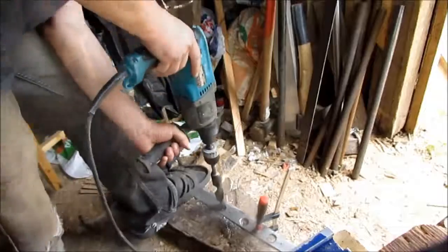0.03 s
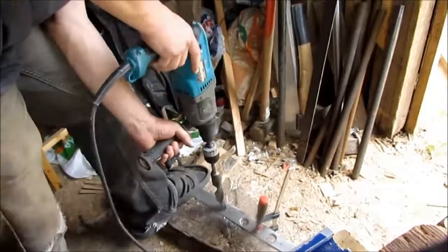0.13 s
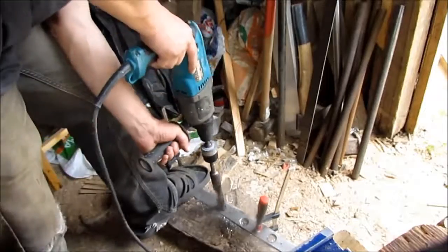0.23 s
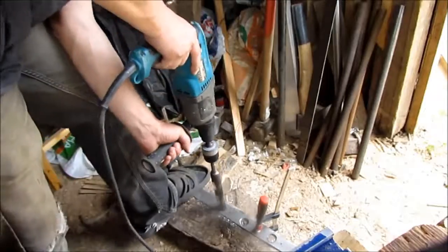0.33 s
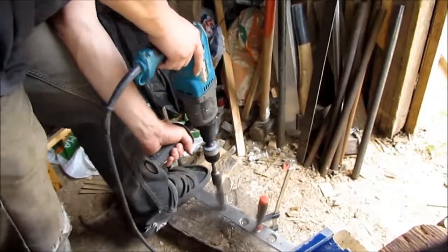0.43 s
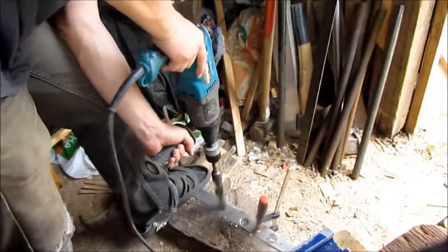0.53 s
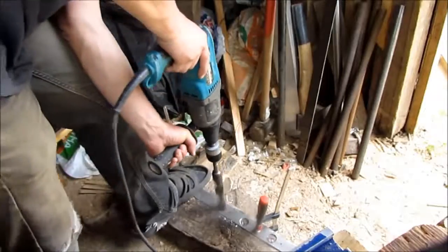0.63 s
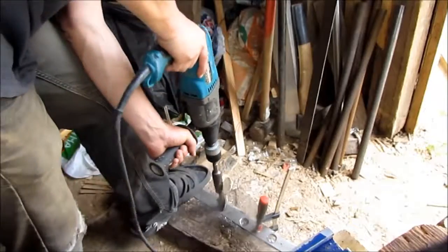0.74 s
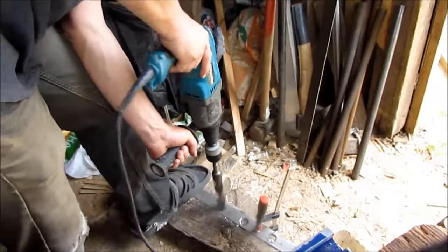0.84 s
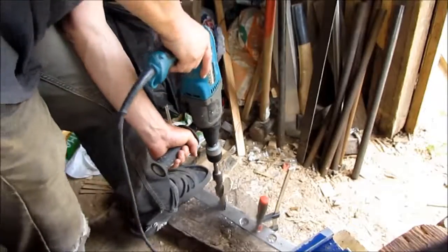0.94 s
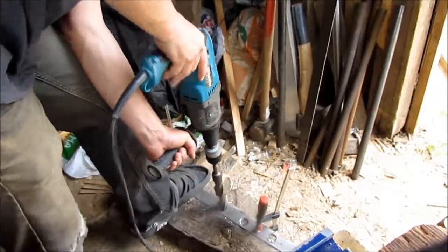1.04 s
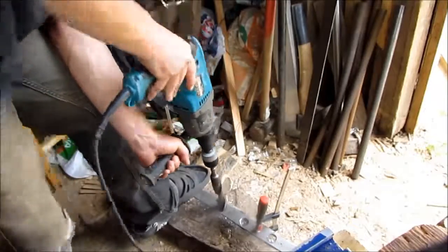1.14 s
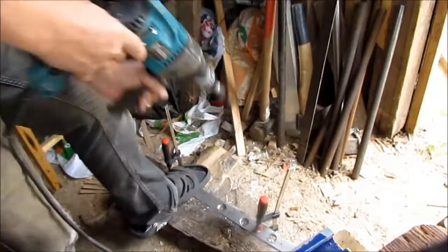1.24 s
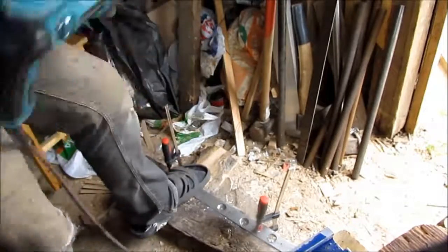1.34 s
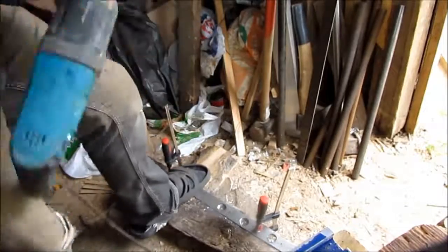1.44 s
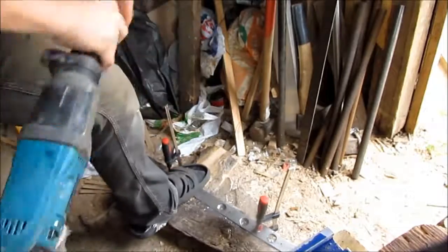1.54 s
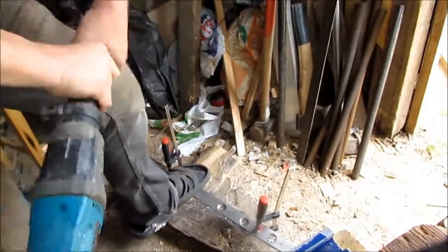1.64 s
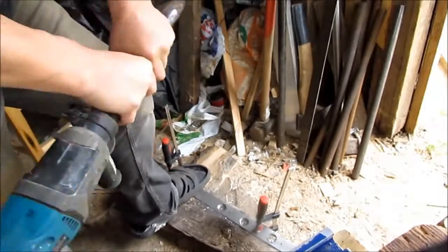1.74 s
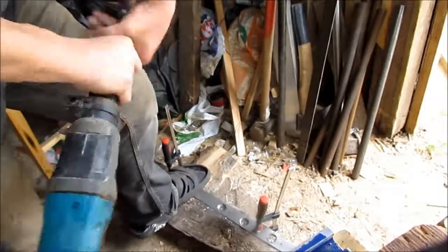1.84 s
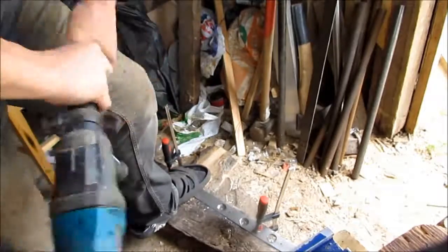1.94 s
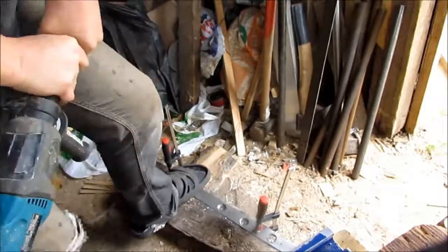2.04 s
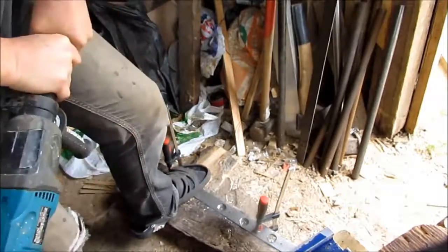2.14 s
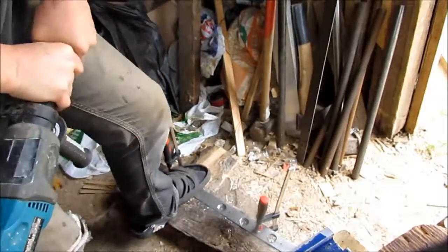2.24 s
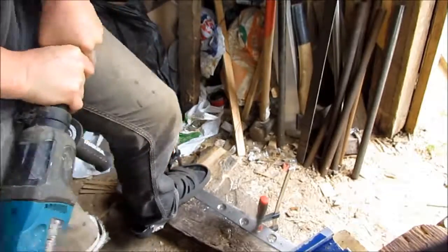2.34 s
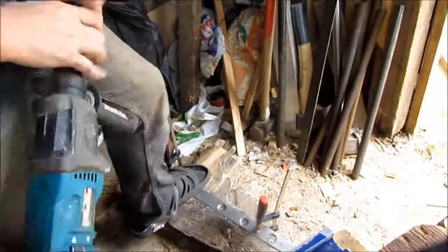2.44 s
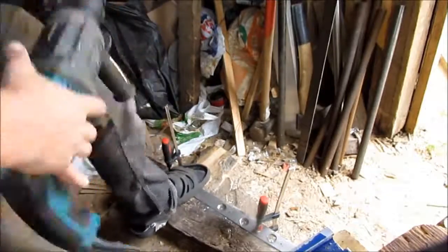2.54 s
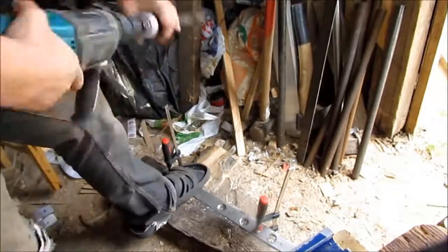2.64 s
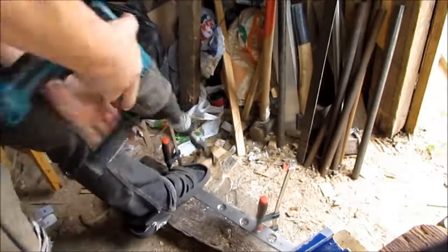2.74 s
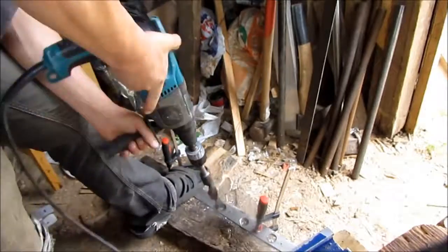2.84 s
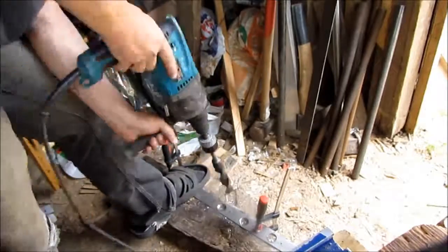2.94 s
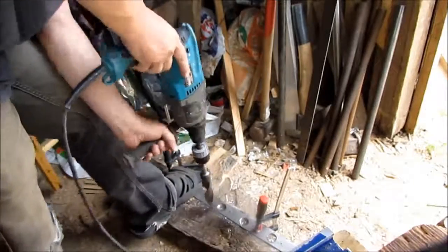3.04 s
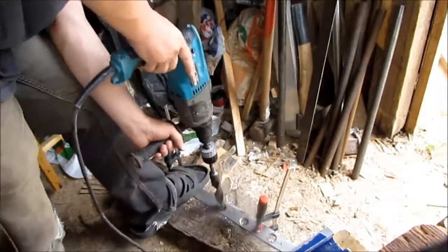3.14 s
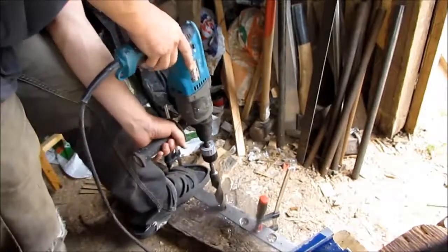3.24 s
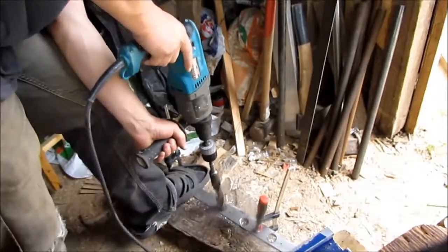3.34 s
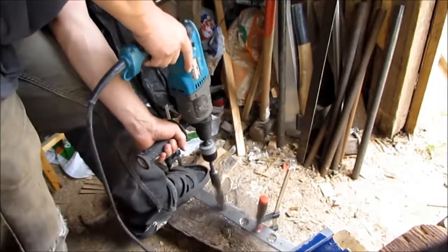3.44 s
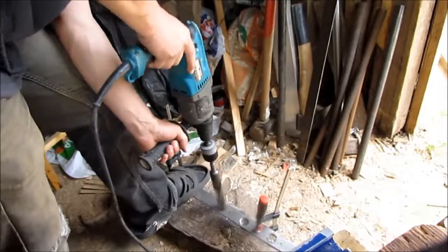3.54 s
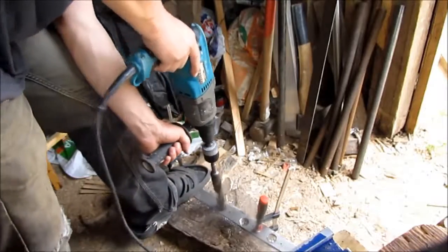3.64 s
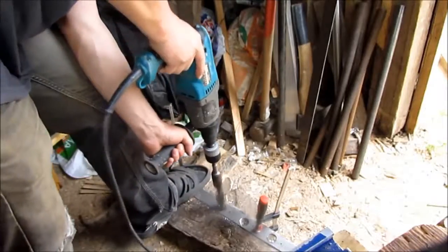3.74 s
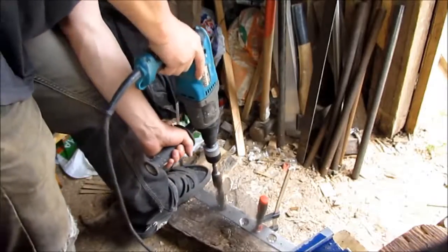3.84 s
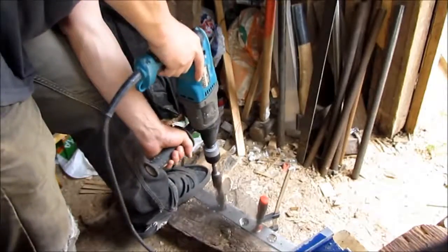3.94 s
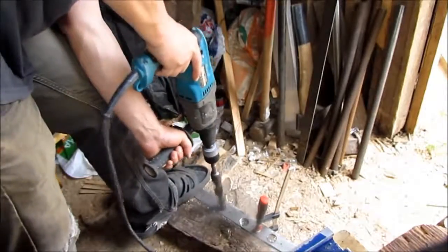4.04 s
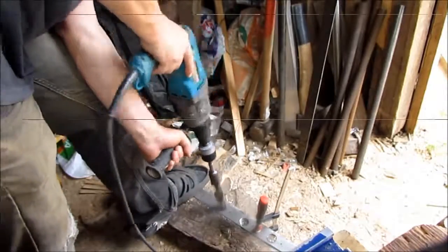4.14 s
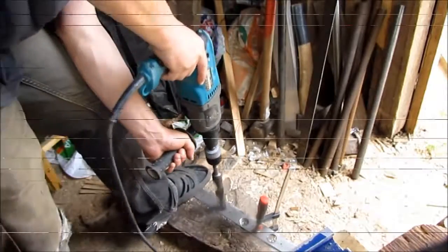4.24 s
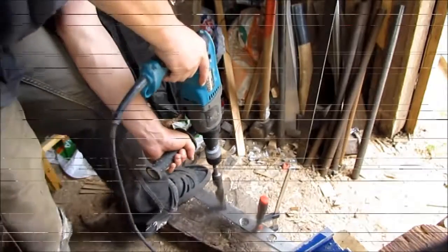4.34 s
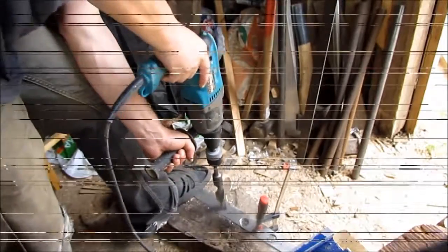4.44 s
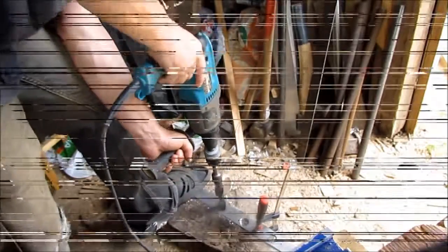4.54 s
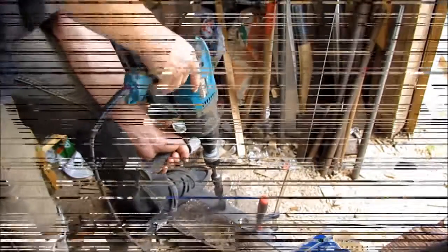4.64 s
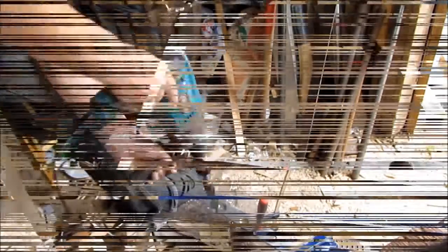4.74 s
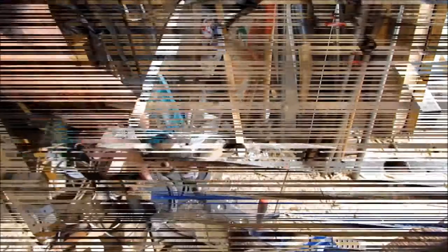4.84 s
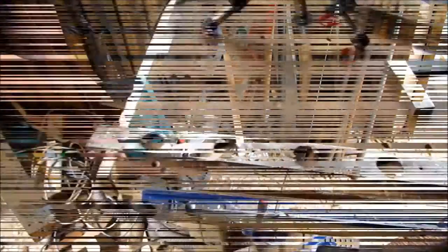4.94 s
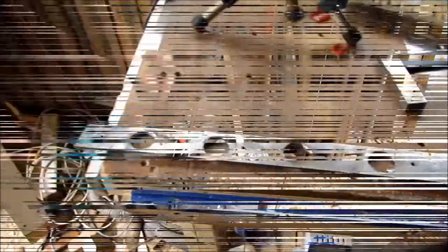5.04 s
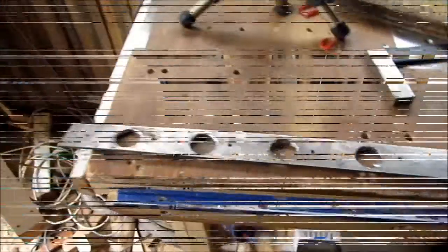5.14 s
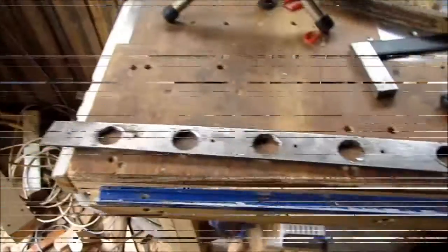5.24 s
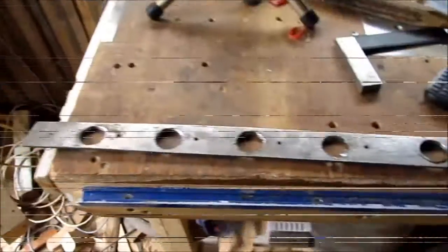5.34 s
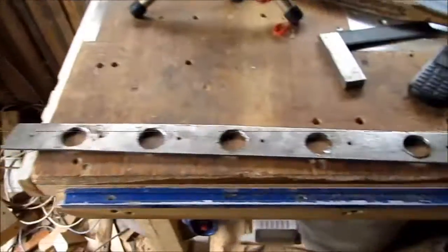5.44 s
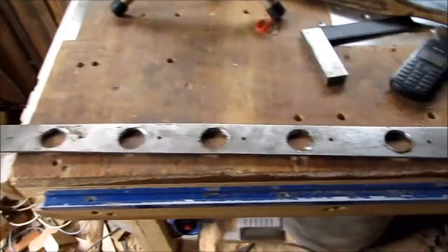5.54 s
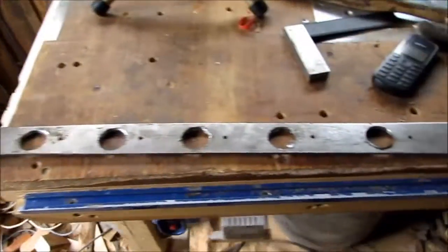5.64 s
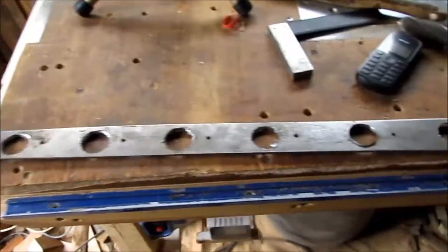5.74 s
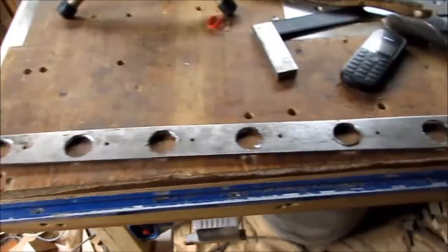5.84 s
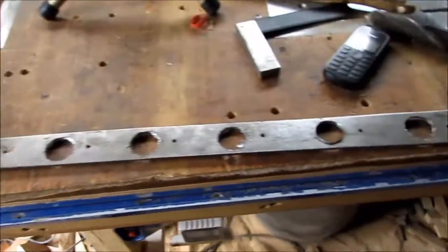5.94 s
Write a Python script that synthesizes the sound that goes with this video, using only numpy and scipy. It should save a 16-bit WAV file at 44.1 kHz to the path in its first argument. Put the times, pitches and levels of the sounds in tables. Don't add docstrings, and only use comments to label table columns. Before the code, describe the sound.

Stereo, close microphone, short dry room tail. A power tool hammers steel in two very loud, bright, buzzing bursts with short breaks of contact in the first. Each ends in falling gear whine and loose knocks. Between them come soft clothing movement, small clicks and little metal rings. At the end only a far-off engine drone with a low hum and slight rustle is left.

```python
import sys
import numpy as np
from scipy import signal
from scipy.io import wavfile
from scipy.ndimage import uniform_filter1d

SR = 44100
rng = np.random.default_rng(int(sys.argv[2]) if len(sys.argv) > 2 else 0)


def materialize(psi):
    bounded = np.clip(np.atleast_2d(psi).T, -1, 1)
    quanta = np.round(bounded * 32767).astype(np.int16)
    wavfile.write(sys.argv[1], SR, quanta)


def ratio(d):
    e = np.asarray(d, float) / 20
    return 10 ** e


N = 264889
BINS_HZ = abs(np.fft.fftfreq(4096, 1 / SR))
DISSOLVE_S = 4.2


def seconds():
    return np.arange(N) / SR


def evened(x):
    return x / np.sqrt(np.mean(x ** 2) + 1e-20)


def read(points, hz):
    f, value = np.transpose(points)
    return np.interp(np.log(hz + 1), np.log(f + 1), value)


def curves(rows):
    s, *columns = np.transpose(rows)
    t = seconds()
    inside = uniform_filter1d(1. * (t >= s[0]) * (t < s[-1]), size=150)
    return [np.interp(t, s, c) for c in columns] + [inside]


def causal(gain):
    taps = np.fft.ifft(np.exp(np.conj(signal.hilbert(np.log(gain))))).real
    size = len(taps)
    window = np.hanning(size + 1)[np.arange(size) - size // 2]
    return (taps * window)[:size // 2] / np.linalg.norm(taps)


def coloured(x, points):
    return signal.oaconvolve(x, causal(ratio(read(points, BINS_HZ))))[:len(x)]


def brightened(x, db):
    top = signal.sosfilt(signal.butter(2, 6000, "high", fs=SR, output="sos"), x)
    return x + (ratio(db) - 1) * top


def drift(per_s):
    slow = signal.butter(2, per_s, fs=SR, output="sos")
    return evened(signal.sosfilt(slow, rng.standard_normal(N)))


def add(mix, s, sound):
    part = mix[round(s * SR):][:len(sound)]
    part += sound[:len(part)]


def puff(length, noise, rise=0.0021, shape=1.21):
    t = np.arange(len(noise)) / SR
    fall = np.exp(-(t / np.clip(length, .0005, .05)) ** shape)
    return noise * (1 - np.exp(-t / rise)) * fall


def swell(s, db, rise, fall):
    u = seconds() - s
    return ratio(db) ** 2 * np.exp(-2 * np.where(u < 0, (u / rise) ** 2, u / fall))


# [trigger t/s, release t/s, coasting time/s]
PULLS = [
    (.217, 1.092, .235),
    (3.338, 4.58, .212),
]


def since_trigger():
    t = seconds()
    return np.min([np.where(t >= row[0], t - row[0], 9) for row in PULLS], axis=0)


DUCK_DB, DUCK_LAG_S, DUCK_S, RECOVER_DB_PER_S = 25, 0.051, 0.045, 27.5


def ducking():
    t, taken_db = seconds(), 0
    for on, off, coast in PULLS:
        onset = np.clip((t - on - DUCK_LAG_S) / DUCK_S, 0, 1)
        slowing_s = np.maximum(t - off - coast / 2, 0)
        taken_db = taken_db + onset * np.clip(DUCK_DB - RECOVER_DB_PER_S * slowing_s, 0, None)
    return taken_db


# [f/Hz, level/dB per Hz]
RUMBLE = [(12, -51), (20, -21), (114, -4), (217, 5.5), (477, -7.5), (528, -2.5), (584, -8.5), (759, -8.5),
          (1360, -17), (2500, -19.5), (3250, -36.5), (5500, -120)]
# [t/s, level/dB, rise/s, fall/s]
BUMPS = [(.05, -52, 0.076, .04), (.18, -49, 0.16, 0.046), (.8, -55, 0.036, .015), (.97, -64, 0.035, 0.046),
         (1.3, -74, 0.22, 0.69), (3.38, -71, 0.027, 0.046), (3.8, -68, 0.054, .05)]
# [f/Hz, level/dB per Hz]
RUSTLE = [(470, -36), (800, -0.5), (2150, 0), (2560, -2), (3350, 0.5), (3700, -1.5), (15100, -6.5),
          (15900, -12.5), (16500, -39)]
# [t/s, level/dB, rise/s, fall/s, treble share/dB]
SWELLS = [(.12, -49, 0.23, 0.12, 1), (1.6, -62.5, 0.063, 0.039, 9), (1.77, -59, 0.048, 0.035, 17.5),
          (1.845, -69, 0.011, .012, 20), (1.89, -58, 0.012, 0.13, 11.5), (2.055, -52.5, 0.082, 0.025, 8.5),
          (2.35, -54.5, 0.15, 0.16, 3), (2.46, -47.5, 0.019, 0.18, 2), (2.75, -53.5, 0.15, 0.22, 0),
          (2.9, -52.5, 0.062, 0.062, 8), (3.13, -58, 0.028, 0.017, 8), (4.8, -69, 0.039, .02, 5),
          (5.32, -54.5, 0.013, 0.06, 2), (5.45, -61.5, 0.25, 0.17, -4)]
RUMBLE_DB = -58
RUSTLE_DB, SECOND_RUSTLE_DB, RUSTLE_DUCK = -58, -67, 0.45


def shed():
    first, duck_db = seconds() < DISSOLVE_S, ducking()
    low = np.sqrt(first * ratio(RUMBLE_DB - duck_db) ** 2 + sum(swell(*row) for row in BUMPS))
    rumble = low * ratio(4.5 + 2.0 * drift(7.7)) * coloured(rng.standard_normal(N), RUMBLE)
    lumps = ratio(1.85 * drift(140) + 0.23 * drift(34))
    grains = coloured(evened(rng.standard_normal(N) * lumps), RUSTLE)
    rest = ratio(np.where(first, RUSTLE_DB - RUSTLE_DUCK * duck_db, SECOND_RUSTLE_DB)) ** 2
    swells = np.array([swell(*row[:4]) for row in SWELLS])
    power = rest + swells.sum(axis=0)
    treble_db = np.transpose(SWELLS)[4] @ swells / power
    return rumble + np.sqrt(power) * brightened(grains, treble_db)


# [f/Hz, width/Hz, level/dB]
BAR = [(782, 37, -35.5), (810, 42, -35), (1120, 23, -11), (1463, 35, -1), (1556, 140, -3), (1776, 54, -7.5),
       (2200, 30, -3.5), (2494, 283, -2), (2700, 105, -1), (2898, 210, -0.5), (3140, 144, -3.5),
       (3460, 460, -2), (4060, 186, -0.5), (4420, 89, -8), (5000, 310, -9.5), (5600, 190, -7.5),
       (6400, 81, -6.5), (7000, 760, -9.5), (7800, 330, -8.5), (8600, 120, -6), (10900, 780, -10.5),
       (12100, 140, -6.5)]
# [f/Hz, level/dB per Hz]
RATTLE = [(100, -69.5), (250, -48), (450, -50), (570, -30.5), (680, -16), (1300, -17), (2000, -12),
          (2500, -20), (4300, -8), (6000, -10), (10000, -11.5), (15500, -14), (17000, -81)]
LEAST_WIDTH_HZ = 80


def steel(force):
    modes = 0
    for hz, width, db in BAR:
        off_centre = 2 * (BINS_HZ - hz) / max(width, LEAST_WIDTH_HZ)
        modes = modes + (ratio(db) / (1 + off_centre ** 2)) ** 2
    modes = modes * np.clip(BINS_HZ / 300, 1e-3, 1) ** 8
    gain = np.sqrt(ratio(read(RATTLE, BINS_HZ)) ** 2 + modes)
    return signal.oaconvolve(force, causal(gain))[:len(force)]


# [t/s, peak level/dB, treble share/dB, bass share/dB, length/s]
KNOCKS = [(0.0282, -18, -10.5, 8, 0.0095), (0.046, -17.5, -8, 5, 0.0035), (0.075, -27.5, -9, -9, 0.0036),
          (0.098, -22, -21, 17, 0.0062), (0.12, -10.5, -7.5, 2, 0.0046), (0.15, -15, 0.5, 15, 0.0021),
          (0.193, -25.5, -7, -5, 0.0033), (0.775, -6.5, 3, -3, 0.0025), (0.826, -17, -1, -2, 0.005),
          (1.025, -9.5, 1, -10, 0.0034), (1.102, -11, 2, -7, 0.0029), (1.203, -32, -6, 6, 0.0054),
          (2.063, -26.5, 0, 6, 0.0018), (2.436, -24.5, -1.5, -12, 0.0062), (2.884, -28.5, 11, 7, 0.0048),
          (3.185, -9, -8, 3.5, 0.0025), (3.204, -16, -4, -4, 0.0023), (4.442, -11.5, -2.5, -2, 0.0062),
          (4.457, -22, -12, -6, 0.0037), (4.527, -17, 0.5, -15, 0.004), (4.542, -14, -1.5, -5.5, 0.0081),
          (4.5704, -13.5, -1.5, -2, 0.0041), (4.577, -17.5, -0.5, -4, 0.0079), (4.679, -26, 7, -7, 0.017),
          (4.741, -36, 4, 15, 0.0073)]


def knocks():
    out = np.zeros(N)
    noises = rng.choice([-1., 1.], (len(KNOCKS), 4000))
    for (s, db, treble_db, bass_db, length), noise in zip(KNOCKS, noises):
        tilt = [(1700, bass_db), (2400, 0.0015), (4500, 0.0041), (8000, treble_db)]
        add(out, s, ratio(db - 5.5) * coloured(steel(puff(1.5 * length, noise)), tilt))
    return out


# [t/s, peak level/dB, centre f/Hz, skirts level/dB]
SNAPS = [(2.1575, -36, 7040, -6), (2.193, -37, 6000, 1), (2.2195, -34, 9000, -4), (2.2945, -35, 7100, -2),
         (2.311, -42, 6500, 0), (2.3165, -37, 3500, -5), (2.333, -29, 6000, -2), (2.342, -33, 3300, -5),
         (2.350, -32, 10500, -5), (2.401, -30, 5500, -2), (2.452, -24, 8000, -14), (2.468, -29, 11500, -8),
         (.038, -19, 4000, -4), (.239, -5, 3300, -11), (2.6145, -19.5, 9800, -5), (2.8915, -20, 9500, -3),
         (2.905, -31, 2200, -10), (2.913, -33, 7000, -4), (3.3605, -8, 6900, -13), (3.35, -12, 2900, -8),
         (3.385, -7, 3000, -6), (3.396, -7, 3000, -9), (3.4205, -6, 3300, -7), (3.444, -8, 2900, -5),
         (3.486, -9, 7500, -5), (4.1016, -11, 3400, -5), (.45, -12, 4100, -7), (.597, -9, 4060, -7),
         (.262, -8.5, 3500, -4), (.744, -10, 4500, -2), (.76, -13, 8000, -3), (.885, -10, 7000, -2),
         (1.103, -17, 5600, -9), (2.081, -37, 5000, -3), (2.864, -34, 9500, -8), (2.985, -38, 4000, -3),
         (3.104, -38, 3000, -3), (3.116, -39, 9000, -4), (3.148, -38, 3000, -3), (2.625, -37, 2000, -3),
         (4.4605, -16, 2700, -4), (4.5815, -14, 3300, -4)]
# [t/s, peak level/dB, centre f/Hz, skirts level/dB]
TICKS = [(1.419, -36, 8700, -4), (1.4415, -34, 4200, 0), (1.452, -35.5, 6500, -6), (1.481, -36.5, 3420, 2),
         (1.512, -40, 3450, -9.5), (1.708, -36, 7930, -8), (1.7546, -32.5, 8150, -14),
         (1.837, -36.5, 11730, -8), (1.973, -37, 11100, -8), (2.034, -25, 6600, -13),
         (2.0605, -27.5, 7350, -5), (2.258, -34, 11200, -14), (2.354, -25.5, 9400, -1),
         (2.368, -25, 6800, -5), (2.391, -27, 6040, -7), (2.4278, -26, 4020, -10), (2.45, -24, 11200, -11),
         (2.614, -25, 9700, -10), (2.6903, -32, 5530, -1.5), (2.7162, -20, 8400, -11),
         (2.774, -27.5, 4100, -7), (2.886, -26, 9900, -5), (2.91, -32, 8660, -6), (5.035, -33, 4140, 0),
         (5.11, -32, 4400, 0), (5.317, -37.5, 3337, -4), (5.577, -36, 3500, 0)]


def ticks(table, length, rise, width=0.34):
    out = np.zeros(N)
    noises = rng.choice([-1., 1.], (len(table), 1500))
    for (s, db, hz, skirt_db), noise in zip(table, noises):
        below = [(hz / 40, skirt_db - 35), (hz / 12, skirt_db - 12.0), (hz * (1 - width / 2), skirt_db)]
        above = [(hz * (1 + width / 2), skirt_db), (22000, skirt_db - 10.5)]
        band = sorted(below + [(hz, 0)] + above)
        add(out, s, ratio(db - 6.0) * coloured(puff(length, noise, rise), band))
    return out


# [t/s, peak level/dB, start f/Hz, end f/Hz, length/s]
RINGS = [(0.043, -38, 258, 232, 0.023), (0.093, -37.5, 445, 458, 0.044), (0.153, -33, 2310, 1970, 0.009),
         (.782, -34, 5600, 5400, 0.048), (.782, -35, 10900, 11200, .024), (.803, -35, 11200, 10100, .026),
         (.99, -37, 6600, 6300, .04), (1.136, -41, 4060, 4060, 0.033), (1.325, -45.5, 3580, 3380, 0.028),
         (2.432, -49.5, 460, 452, 0.026), (2.435, -42.5, 900, 915, 0.017),
         (2.438, -44.5, 1220, 1184, 0.024), (2.439, -42, 11750, 11200, 0.054),
         (2.438, -46, 4100, 3980, 0.022), (2.454, -62, 4700, 4720, .12), (2.45, -53, 8550, 8500, .06),
         (2.436, -51, 2950, 2960, 0.054), (2.446, -60, 2940, 2960, 0.25), (3.188, -40, 753, 776, 0.033),
         (3.1853, -27, 4100, 4080, 0.01), (3.185, -30, 2760, 2700, 0.0076),
         (3.2035, -38, 4030, 4130, 0.006), (3.103, -56, 8800, 11600, .022), (3.2035, -34, 3430, 3280, .007),
         (3.208, -34.5, 1480, 1470, 0.0079), (3.213, -46, 1480, 1440, 0.017),
         (3.238, -57, 2180, 2180, 0.054), (4.455, -40, 5800, 6000, .035), (4.488, -37, 6300, 6500, 0.061),
         (4.697, -42, 11600, 12000, .012), (4.686, -42, 13700, 13700, .014), (4.745, -51, 7900, 7700, .04),
         (2.247, -50, 10600, 11200, .008), (2.257, -48, 10800, 11600, .008), (1.972, -52, 8600, 7500, .02),
         (1.2, -42, 4250, 4150, .014), (4.682, -26, 6670, 7470, 0.0218), (4.697, -33, 6100, 5500, 0.014),
         (4.72, -38.5, 6800, 6400, 0.016), (5.982, -43.5, 640, 680, 0.027)]


def rings(rough=0.45, waver=0.01):
    out, wobble = np.zeros(N), 1 + waver * drift(250)
    for s, db, start_hz, end_hz, length in RINGS:
        hz = np.linspace(start_hz, end_hz, round(length * SR))
        turns = np.cumsum(hz * wobble[round(s * SR / 2):][:len(hz)]) / SR
        octave = 0.084 * np.sin(4 * np.pi * turns) * (start_hz < SR / 5)
        tone = np.sin(2 * np.pi * turns) + octave
        add(out, s, ratio(db) * tone * signal.windows.tukey(len(turns), .6))
    return out * (1 + rough * drift(400))


# [t/s, level/dB of its own ring]
SEATING = [(0.22, 1), (0.4, -0.5), (0.53, -0.5), (0.62, 4.5), (0.7, 1), (0.75, -2.5), (0.9, -1.5),
           (1.06, -1), (3.34, -6), (3.42, -4), (3.52, 0), (3.75, 0), (3.95, 2), (4.2, 0.5), (4.38, -0.5),
           (4.45, -3)]
BIT_HZ, BIT_WIDTH_HZ, BAR_HZ, BAR_WIDTH_HZ, BAR_SHARE = 4080, 330, 2900, 440, -0.5


def shifting(x, patchy_db=1.2):
    hz, t, z = signal.stft(x, SR, nperseg=512)
    patches = rng.standard_normal(z.shape[::-1]).T
    patches = evened(uniform_filter1d(uniform_filter1d(patches, size=4, axis=0), size=8, axis=1))
    bit = np.exp(-((hz - BIT_HZ) / BIT_WIDTH_HZ) ** 2)
    bar = np.exp(-((hz - BAR_HZ) / BAR_WIDTH_HZ) ** 2)
    seat_db = np.outer(bit + BAR_SHARE * bar, np.interp(t, *np.transpose(SEATING)))
    return signal.istft(z * ratio(patchy_db * patches + seat_db), SR, nperseg=512)[1][:N]


LEAN_DB_PER_S, LIFT_DB = 1, -8.5
TREBLE_DB, TOUCH_TREBLE_DB, TOUCH_S = 1.5, 21, 0.0023


def pressed(sound, start, end, db, bite, lift):
    u, left = seconds() - start, end - seconds()
    force_db = db + LEAN_DB_PER_S * u + LIFT_DB * np.clip(1 - left / lift, 0, 1)
    inside = np.clip(u / bite, 0, 1) * np.clip(left / 0.0041, 0, 1)
    treble_db = TREBLE_DB + TOUCH_TREBLE_DB * np.exp(-abs(u) / TOUCH_S)
    return inside * ratio(force_db) * brightened(sound, treble_db)


# [start t/s, end t/s, feed force level/dB, bite/s, lift/s]
CONTACT = [(0.217, 0.775, -22.5, 0.018, 0.019), (0.823, 0.99, -21.5, 0.021, 0.037),
           (1.036, 1.088, -24, 0.012, 0.0043), (3.341, 4.142, -23, 0.018, 0.029),
           (4.142, 4.439, -22, 0.064, 0.0038)]
# [t/s after the trigger, rate/blows per s]
BLOWS = [(0, 85), (.16, 96), (.3, 96), (.45, 88.5), (1.2, 87)]
# [f/Hz, level/dB]
GRIPS = [
    [(1300, -0.4), (1560, -0.5), (2100, -2), (2750, -0.5), (3800, 0.8), (4075, 2.5), (4300, 1.5),
     (9000, -0.6)],
    [(1300, -0.3), (1520, -2.5), (2100, -0.5), (2700, 0.5), (3800, 0.5), (4060, 1), (4300, 2), (9000, -0.3)],
]
THUMP_DB = [-54, -47, -40.5, -33.5, -36.5, -36.5]
SURGE_DB, SETTLE_S = 7, 0.044


def hammering(jitter=.045, second_blow_db=-2, uneven_db=1.9, between=1.0, sharp=1.5,
              chips_per_s=16000, spread_db=2.6):
    blows_per_s = np.interp(since_trigger(), *np.transpose(BLOWS))
    turns = np.cumsum(blows_per_s * (1 + jitter * drift(23.9))) / SR
    blow = turns.astype(int)
    chance = rng.standard_normal(blow[-1] + 1)[blow]
    strength = ratio(second_blow_db * (blow % 2) + uneven_db * chance)
    shower = between + strength * abs(np.sin(np.pi * (turns % 1) ** 0.37)) ** (2 * sharp)
    chips = (rng.random(N) < chips_per_s / SR) * rng.choice([-1, 1], N)
    chips = chips * ratio(spread_db * np.minimum(rng.exponential(1, N), 4))
    sound = evened(shifting(steel(shower * chips * ratio(0.11 * drift(40)))))
    first_grip, second_grip = (coloured(sound, grip) for grip in GRIPS)
    sound = np.where(seconds() < PULLS[1][0], first_grip, second_grip)
    for k, db in enumerate(THUMP_DB, 1):
        sound = sound + ratio(db + 4.06 * drift(7.6)) * np.sin(2 * np.pi * k * turns)
    surge = ratio(SURGE_DB * np.exp(-np.maximum(since_trigger() - .02, 0) / SETTLE_S))
    return surge * sum(pressed(sound, *row) for row in CONTACT)


# [f/Hz, level/dB per Hz]
FAN = [(150, -65), (300, -8.5), (550, -25.5), (800, -8.5), (1200, -1), (1500, -4), (2740, -8), (3970, 0),
       (5280, 1.5), (7760, 1), (15200, -1), (16500, -19)]
# [fan level/dB, gain drift while coasting/dB per s]
MOTOR_DB = [
    (-35.5, -1.5),
    (-33.5, -34),
]
COAST_BOOST_DB = [7, 16]
MESH_DB = [0, 1, -4, -4, -2, -4, -8]
# [f/Hz, level/dB]
HOUSINGS = [
    [(1000, -20), (1600, 1), (2000, 6), (2600, -22), (3450, -5), (4100, -5), (5300, -5), (6400, -5),
     (8500, -1), (9800, -9), (12000, -5), (16000, -14)],
    [(1000, -40), (2400, -26), (2900, -7), (4400, -7), (5200, -16), (6000, -7), (6800, -2), (9800, -1),
     (11000, -5), (12500, -3), (16000, -10)],
]
MESH_HZ, DRAG_HZ, SPIN_UP_S = 5500, 1200, .05
WHINE_DB, COAST_WHINE_DB, WHINE_DB_PER_DECADE = -55, -51, [3, 21]
LOW_WHINE_DB_PER_DECADE, LOW_WHINE_HZ = 35, 2500
FAN_DB_PER_DECADE, FAN_RING_DB = 16.5, -4.5
LOW_FAN_DB_PER_DECADE, LOW_FAN_HZ = 23, 3000


def motor(waver=0.005):
    air = rng.standard_normal(N)
    hiss = coloured(air, FAN) + ratio(FAN_RING_DB) * steel(air[::-1])
    hiss = evened(hiss) * ratio(1.4 * drift(60))
    low = signal.sosfiltfilt(signal.butter(3, LOW_FAN_HZ, fs=SR, output="sos"), hiss)
    fuzz = [(1 + .5 * drift(120)) * ratio(1.4 * drift(26)) for _ in range(5)]
    wobble, out = 1 + waver * drift(310), np.zeros(N)
    bursts = zip(PULLS, MOTOR_DB, COAST_BOOST_DB, HOUSINGS, WHINE_DB_PER_DECADE)
    for (on, off, coast), (run_db, drift_db), boost_db, vents, fade_db in bursts:
        span = slice(round(on * SR), round((off + 2 * coast) * SR))
        t = seconds()[span]
        after = np.maximum(t - off, 0)
        hz = np.maximum((MESH_HZ + DRAG_HZ) * np.exp(-after / coast) - DRAG_HZ, 1)
        decades = np.log10(hz / MESH_HZ)
        inside = np.clip((t - on) / SPIN_UP_S, 0, 1) ** 2 * np.clip(hz / 520 - .7, 0, 1)
        fan_db = run_db + FAN_DB_PER_DECADE * decades + drift_db * after
        whine_db = np.where(t < off, WHINE_DB, COAST_WHINE_DB + boost_db)
        whine_db = whine_db + fade_db * decades + drift_db * after
        turns = np.cumsum(hz * wobble[span]) / SR
        whine = 0
        for k, db in enumerate(MESH_DB, 1):
            low_db = LOW_WHINE_DB_PER_DECADE * decades * (k * hz < LOW_WHINE_HZ)
            level = ratio(db + read(vents, k * hz) + low_db) * (k * hz < SR / 2.5)
            whine = whine + level * fuzz[k % len(fuzz)][span] * np.sin(2 * np.pi * k * turns)
        fan = hiss[span] + (ratio(LOW_FAN_DB_PER_DECADE * decades) - 1) * low[span]
        out[span] += inside * (ratio(fan_db) * fan + ratio(whine_db) * whine)
    return out


# [t/s, level/dB]
GENERATOR = [(4.08, -78), (4.15, -48), (4.4, -47.5), (4.8, -47), (5.4, -47), (6.01, -47)]
# [multiple of the firing rate, level/dB]
EXHAUST = [(1, -3), (2, 2.5), (3, -11), (4, -2.5), (5, -2), (6, -11), (7, -10.5), (8, -6), (9, -13.5),
           (10, -34), (11, -19), (12, -12)]
# [f/Hz, level/dB per Hz]
DRONE = [(12, -28), (20, 5.5), (51, -1), (97, -6), (200, -7.5), (538, -17.5), (649, -12), (703, -19),
         (996, -19.5), (1660, -26.5), (12000, -42), (15600, -65), (22000, -120)]
# [t/s, f/Hz, level/dB]
PIPE = [(4.08, 184.5, -65), (5.0, 183.7, -51), (5.5, 183.8, -55.5), (5.65, 184.5, -47.5),
        (6.01, 187, -51.5)]
FIRING_HZ = 26.9


def generator(noise_db=0.0, uneven_db=2.0, throb=0.047):
    db, inside = curves(GENERATOR)
    turns = np.cumsum(FIRING_HZ * (1 + 0.0018 * drift(3.05))) / SR
    orders = 0
    for k, (_, order_db) in enumerate(EXHAUST, 1):
        level = ratio(order_db + uneven_db * drift(7.2))
        orders = orders + level * np.cos(2 * np.pi * k * turns + 0.195 * k ** 2)
    drone = coloured(rng.standard_normal(N), DRONE) * (1 + throb * np.cos(2 * np.pi * turns))
    pipe_hz, pipe_db, _ = curves(PIPE)
    pipe = ratio(pipe_db + 3.7 * drift(7.6)) * np.sin(2 * np.pi * np.cumsum(pipe_hz) / SR)
    return inside * (ratio(db) * (evened(orders) + ratio(noise_db) * drone) + pipe)


# [f/Hz, side minus mid level/dB]
PORTS = [(60, -11), (290, -7), (640, -1.5), (3100, -5.5), (15000, -1.5)]
# [f/Hz, side minus mid level/dB]
SECOND_PORTS = [(60, -13), (290, -12), (640, -5.5), (3100, 0.5), (15000, -0.5)]
# [f/Hz, side minus mid level/dB]
TOOL_WIDTH = [(300, -12), (2900, -10), (5500, -6), (9000, -3), (15000, -1)]
# [f/Hz, deviations]
KEPT = [(2640, 2.2), (2680, -1.3), (3050, -1.3), (3150, .35), (8000, .2), (12000, -.2)]
STARVED_COASTS, WIDE_FROM_S = 1.2, 4.78
KNOCK_DIN_DB = -42


def scattered(x, lean=0.034):
    hz, t, z = signal.stft(x, SR, nperseg=512)
    din = np.linalg.norm(z[hz > 1000], axis=0) > ratio(KNOCK_DIN_DB)
    for on, off, coast in PULLS:
        din = din | (t > on) & (t < min(off + STARVED_COASTS * coast, WIDE_FROM_S))
    blocks = rng.standard_normal((len(t) // 4 + 1, len(hz) // 4 + 2))
    blocks = evened(uniform_filter1d(blocks[:, 1:], size=3, axis=0) + .45 * blocks[:, :1])
    kept = blocks[np.arange(len(t)) // 4][:, np.arange(len(hz)) // 4].T > read(KEPT, hz)[:, None]
    calm_db = np.where(t < DISSOLVE_S, read(PORTS, hz)[:, None], read(SECOND_PORTS, hz)[:, None])
    gain = np.where(din, kept * ratio(read(TOOL_WIDTH, hz))[:, None], ratio(calm_db))
    phases = np.exp(2j * np.pi * rng.random(z.shape[::-1]).T)
    z = z * (phases * gain - lean * (gain > 0))
    return ratio(2.5) * signal.istft(z, SR, nperseg=512)[1][:N]


def scene():
    t = np.arange(8000) / SR
    tail = rng.standard_normal(len(t)) * ratio(-60 * t / .1) * (t > .004)
    handling = knocks() + ticks(SNAPS, .0015, .0003) + rings() + ticks(TICKS, 0.003, 0.0011)
    near = handling + hammering() + motor()
    near = near + ratio(-13.5) * signal.oaconvolve(near, tail / np.linalg.norm(tail))[:N] + shed()
    far = generator()
    lean = 0.023 * far * (seconds() > WIDE_FROM_S)
    return near + far + (scattered(near + far) - lean) * [[1], [-1]]


# [f/Hz, level/dB]
STARVED = [(60, -52), (250, -54), (400, -52), (550, -45), (900, -46), (2000, -42), (2300, -50), (2600, -90)]
STARVED_DB, DIN_MEMORY_S, DIN_DB = -16, .06, -31
DIN_LASTS_S = 1.5


def starved(x):
    hz, t, z = signal.stft(x, SR, nperseg=2048)
    power = abs(z.mean(axis=0)) ** 2 + 1e-16
    keep = np.exp(-t[1] / DIN_MEMORY_S)
    din = signal.lfilter([1 - keep], [1, -keep], power.sum(axis=0))
    running = np.interp(t, seconds(), since_trigger()) < DIN_LASTS_S
    band = uniform_filter1d(uniform_filter1d(power, size=4, axis=0), size=3, axis=1)
    under_db = 10 * np.log10(abs(band) / din) - read(STARVED, hz)[:, None]
    loud = (din > ratio(DIN_DB) ** 2) * running
    cut_db = STARVED_DB * np.clip(-under_db, 0, 1) * loud
    return signal.istft(z * ratio(cut_db), SR, nperseg=2048)[1][:, :N]


def roll_off(x):
    return signal.sosfilt(signal.butter(12, 16810, fs=SR, output="sos"), x)


def record(dry):
    limited = signal.oaconvolve(starved(dry), signal.firwin(255, 16100, fs=SR)[None], "same")
    return roll_off(limited)


dry = scene()
out = record(dry)
materialize(out)
```